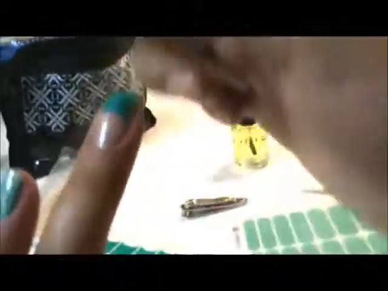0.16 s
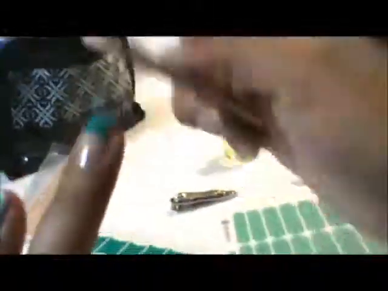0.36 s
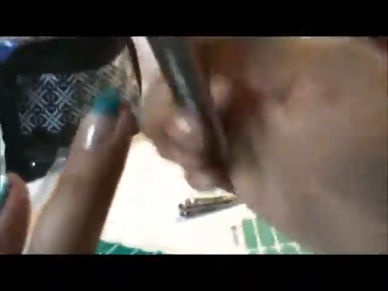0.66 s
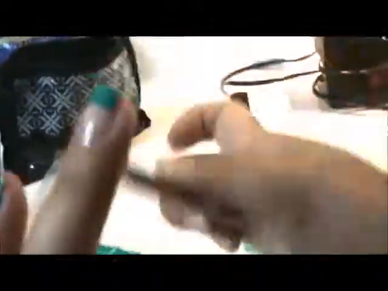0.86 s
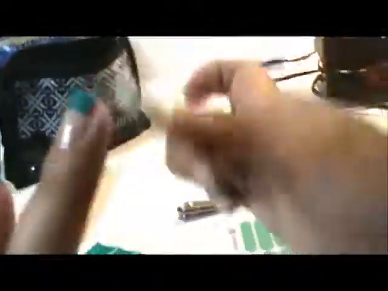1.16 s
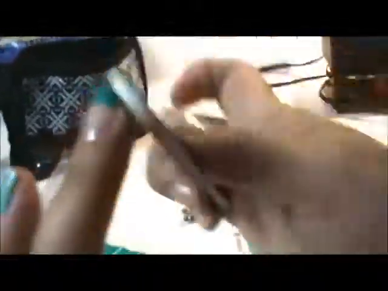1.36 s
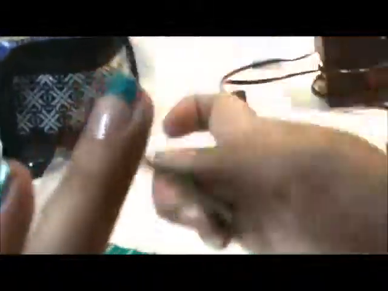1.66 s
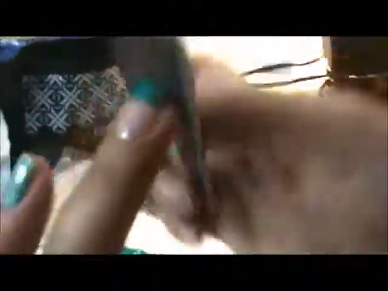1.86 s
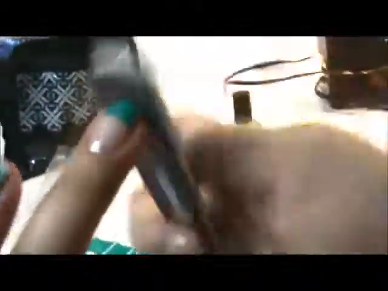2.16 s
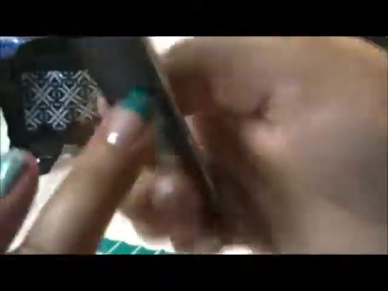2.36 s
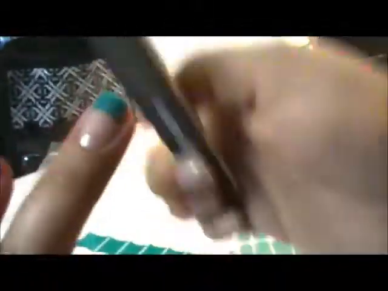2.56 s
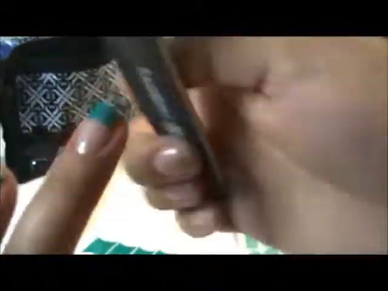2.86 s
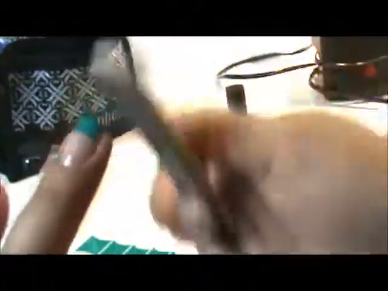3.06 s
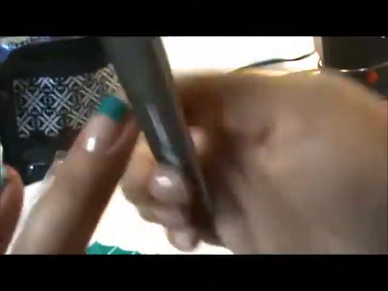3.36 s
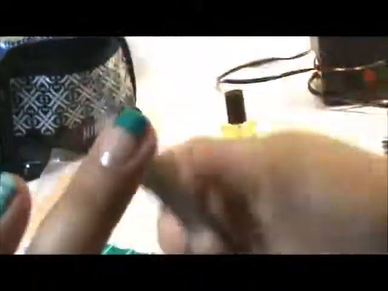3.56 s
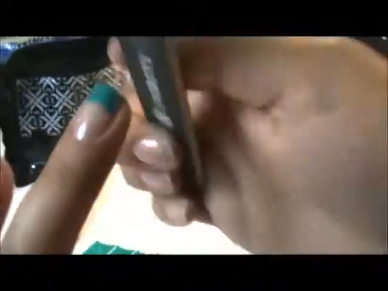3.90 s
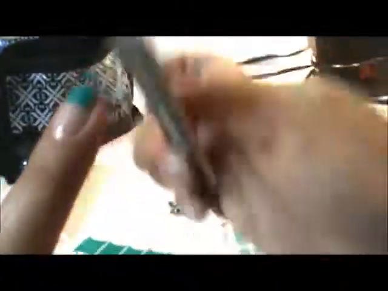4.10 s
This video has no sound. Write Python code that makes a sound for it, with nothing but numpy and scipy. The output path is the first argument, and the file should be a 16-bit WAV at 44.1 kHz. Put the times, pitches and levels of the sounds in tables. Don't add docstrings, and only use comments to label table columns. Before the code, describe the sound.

A steel nail file rasps in short quick strokes across a fingernail tip, each starting with a small tap, over a low fan hum.

```python
import sys
import numpy as np
from scipy import signal
from scipy.fft import rfft, irfft, next_fast_len
from scipy.io import wavfile
from scipy.ndimage import uniform_filter1d, map_coordinates

SR = 44100
rng = np.random.default_rng(int(sys.argv[2]) if len(sys.argv) > 2 else 0)


def undo_db(level):
    steps = np.asarray(level, float) / 20
    return 10 ** steps


def transcribe(signal):
    frames = np.atleast_2d(signal).T
    limited = np.clip(frames, -1, 1)
    pcm = np.round(limited * 32767).astype(np.int16)
    wavfile.write(sys.argv[1], SR, pcm)


N = 186763

# [time_s, fan_db]
FAN_LEVEL = [
    (0.0, -39.5),
    (0.4, -38.5),
    (0.87, -37),
    (1.83, -35.5),
    (2.2, -39.5),
    (2.3, -46),
    (2.56, -47),
    (2.71, -44),
    (3.06, -43),
    (4.23, -41),
]
# [freq_hz, density_db]
FAN_RUMBLE = [(15, -37), (25, -13), (107, -9), (166, -5), (199, -7.5), (356, -9), (386, -19.5), (433, -11),
              (579, -16), (670, -15.5), (1200, -21.5), (1560, -68), (2640, -120)]
# [freq_hz, width_hz, level_db]
FAN_DRONE = [(42.7, 5.3, 0), (124, 7.3, 5), (167.3, 5.4, 6), (301, 10.4, 3.5), (364, 7.4, 10.5)]
# [freq_hz, density_db]
AIR_HISS = [(530, -24), (900, 1), (1030, -10), (1970, 0), (2500, -8.5), (3590, -8), (3860, -14), (4360, -8),
            (16000, -21)]
# [freq_hz, likeness_0_to_1]
AIR_LIKENESS = [(60, 1), (250, 0.97), (600, 0.72), (1500, 0.29), (3300, 0.09), (8000, 0.63), (14000, 1)]
# [freq_hz, lead_rad]
AIR_LEAD = [(100, 0.068), (250, 0.18), (600, 0.28), (1300, 1.2), (2000, 2.7), (3300, 0.63)]
# [freq_hz, t60_s]
ROOM_DECAY = [(200, 0.29), (2000, 0.27), (10000, 0.099)]
# [middle_s, half_length_s, level_db, high_skim_share_0_to_1]
RETURNS = [(0.031, 0.0068, -41, 0.1), (0.192, 0.045, -55, 0.1), (0.518, 0.022, -59, 0.2),
           (0.805, 0.033, -47, 0.3), (1.085, 0.025, -44.5, 0.5), (1.374, .03, -54, 0.8),
           (1.633, 0.027, -48, 0.3), (1.88, 0.017, -46, 0.6), (2.16, 0.17, -52.5, 0.05),
           (2.445, 0.028, -52.5, 0), (2.712, 0.026, -48.5, 0), (2.975, 0.025, -49, 0.01),
           (3.213, 0.022, -53, 0.4), (3.504, 0.035, -46, 0.15), (3.751, 0.02, -48, 0.2),
           (4.014, 0.018, -48.5, 0.1)]
# [freq_hz, width_hz]
SKIM_BANDS = [(8100, 2600), (9800, 860)]
# [start_s, tick_peak_db, thud_db, thud_hz, flesh_gives_way_ms]
LANDINGS = [(0.0145, -10, -26.5, 203, 1), (0.0622, 3, -29.5, 150, 3.5), (0.325, -15, -32.5, 147, 3),
            (0.601, -9, -24.5, 193, 5), (0.875, -16.5, -23.5, 211, 3.6), (1.1464, -18, -25, 212, 3.4),
            (1.4224, -15.5, -26.5, 219, 2.9), (1.6899, -16, -22, 203, 1.8), (1.956, -7, -20.5, 237.4, 0.5),
            (2.2266, -5.5, -22.5, 210.6, -0.56), (2.4871, -37, -31.5, 220, 0), (2.7644, -8, -27, 249, -0.4),
            (3.0368, -11.5, -31, 175.7, -0.2), (3.3189, -9.5, -29.5, 278, 0.4),
            (3.5459, -21, -25.5, 250, -0.5), (3.807, -20.5, -27.5, 250, 0.8), (4.07, -24, -28.5, 223, 1)]
# [start_s, entry_db, contact_s, exit_db, liftoff_s]
FILING = [(.063, -26.5, .048, -26, .028), (.360, -31, .056, -33, .035), (0.632, -31.5, .068, -22.5, 0.017),
          (.900, -27, .062, -21.5, 0.019), (1.175, -26, .078, -28, 0.017), (1.446, -26.5, .072, -25, 0.023),
          (1.703, -22, .065, -21, .022), (1.9795, -18, .062, -26, 0.03), (2.255, -26, .055, -30, 0.041),
          (2.514, -38.5, .072, -33.5, 0.02), (2.793, -31, .066, -36, 0.0153),
          (3.078, -23, .062, -27.5, .045), (3.331, -23, .05, -25.5, 0.03), (3.575, -27.5, .066, -34, 0.019),
          (3.832, -29, .065, -31, .035), (4.0874, -22.5, .075, -29.5, 0.033)]
# [start_hz, top_hz, entry_db, exit_db, nail_body_db]
BENDS = [(150, 560, -6, -10, -3), (250, 450, -8.5, -3.5, -2.5), (292.4, 620, -7, -14, -3.5),
         (186.9, 760, -2, -16, -6), (220.1, 520, -6, -21.5, -6.5), (230.5, 600, -5, -24, -6),
         (204.9, 720, -4.5, -13.5, -5.5), (202.4, 650, 0.5, -12, -4), (151.5, 690, -3.5, -3.5, 0),
         (222, 450, 4.5, -14.5, -4), (250, 560, -0.5, -13, -2.5), (150, 700, -5, -7.5, -2.5),
         (282, 700, 0.5, -12, -2.5), (222.5, 500, -0.5, -14, -3), (242, 640, 4.5, -2.5, -1.5),
         (215.1, 590, -1.5, -8.5, -5)]
CHATTER_DEPTH = [2, 1.5, 2, 3, 2, 2, 2, 8, 7, 1.5, 3, 10, 3, 5, 5, 5]
# [start_s, peak_db]
GRIP_SKIPS = [(0.027, -11.5), (0.0384, -19), (0.346, -15.5), (1.971, 2), (2.249, -3), (3.3269, -7),
              (3.0567, -13), (3.0652, -5), (3.5702, -20), (1.1763, -9), (3.8181, -23), (3.8267, -11.5)]
# [start_s, peak_db]
GRIT_CATCHES = [(0.061, 8), (0.066, 6), (0.4286, -5), (0.6439, -13), (0.9024, -7), (0.957, 3.5),
                (1.4575, -6), (1.2427, 5), (1.252, -4), (1.51, -16), (1.7459, 10.5), (1.9793, 6.5),
                (1.9845, -1), (1.9928, 7), (2.002, 2), (2.0167, 2), (2.0368, 8), (2.2623, -7), (2.2674, 1),
                (2.2956, -6), (2.2825, -12), (2.799, -5.5), (3.077, -1.5), (3.084, 6), (3.0912, -2),
                (3.1106, -12), (3.1184, 4), (3.3335, -9), (4.088, -2), (4.0997, 3.5)]
# [start_s, peak_db]
TIP_FLICKS = [
    (0.443, -32),
    (0.9807, -25),
    (1.7817, -28),
    (2.058, -28),
    (2.598, -27),
    (2.8677, -25.5),
    (4.161, -23),
]
# [freq_hz, width_hz, level_db]
FLICK_TICK = [(4600, 3400, 1)]
# [freq_hz, density_db]
GRIT_COLOUR = [(1530, -25.5), (2600, -9), (4260, -5.5), (5110, -5), (6000, -3), (6780, -1.5), (7650, -8),
               (9330, -6), (9910, -11.5), (11600, -10), (13700, -17.5), (14900, -19), (16000, -24)]
# [freq_hz, width_hz, level_db]
WEAK_BLADE = [(9760, 1300, -21.5), (11160, 540, -12)]
# [freq_hz, width_hz, level_db]
BLADE_RING = [(6920, 200, 0), (7150, 220, -6), (6650, 240, -8)]
# [freq_hz, width_hz, level_db]
NAIL_BODY = [(1553, 287, 4), (1917, 680, 10)]
# [freq_hz, likeness_0_to_1]
FILE_LIKENESS = [(250, 0.98), (600, 0.8), (2000, 0.68), (3300, 0.67), (5000, 1), (9000, 0.6), (14000, 0.9)]
# [freq_hz, lean_db]
FILE_LEAN = [(250, -1.1), (600, 3.5), (1300, 2), (2000, 3.5), (5000, -0.6), (9000, 4), (14000, 2.5)]

BEND_LEAD_S = 0.00834
HALVES = np.array([[.5], [-.5]])


def unit(x):
    return x / np.sqrt(np.mean(x ** 2) + 1e-20)


def along(points, hz):
    f, v = np.transpose(points)
    return np.interp(np.log(hz + 1), np.log(f + 1), v)


def curves(rows):
    s, *cols = np.transpose(rows)
    return [np.interp(np.arange(N) / SR, s, c) for c in cols]


def wobble(rate):
    return map_coordinates(rng.standard_normal(N // 8), [np.arange(N) * rate / SR])


def filtered(x, response):
    m = next_fast_len(N + SR // 2)
    return irfft(rfft(x, m) * response(np.fft.rfftfreq(m, 1 / SR)), m)[..., :N]


def modes(table, f):
    return sum(undo_db(db) * 1j * f * w / (c * c - f * f + 1j * f * w) for c, w, db in table)


def causal(points, hz):
    cepstrum = irfft(np.log(undo_db(along(points, hz))))
    cepstrum[1:len(hz) - 1] *= 2
    cepstrum[len(hz):] = 0
    return np.exp(rfft(cepstrum))


def rush(spectrum, alike):
    def spread(hz):
        turn = np.arccos(np.clip(along(alike, hz), -1, 1)) / 2
        return spectrum(hz) * [np.cos(turn), np.sin(turn)]

    mid, side = filtered(rng.standard_normal((2, N)), spread)
    return unit(np.array([mid + side, mid - side]))


def patchy(x, depth_db):
    z = signal.stft(x, nperseg=256)[2]
    field = uniform_filter1d(rng.standard_normal(z.shape), size=4, axis=0)
    field = uniform_filter1d(field, size=5, axis=1)
    return signal.istft(z * undo_db(depth_db * unit(field)), nperseg=256)[1][:N]


def strike(rows, colour):
    t, out = np.arange(1500) / SR, np.zeros(N + 1500)
    for at, db, t60 in rows:
        swell = undo_db(db - 60 * t / t60) * (1 - np.exp(-t / 0.00039))
        out[round(at * SR):][:1500] += swell * rng.standard_normal(1500)
    return filtered(out[:N], colour)


def air():
    fan_db, = curves(FAN_LEVEL)
    hiss_db = -51 + 0.9 * (fan_db - fan_db.mean())
    fan = rush(lambda hz: undo_db(along(FAN_RUMBLE, hz)) * (1 + np.abs(modes(FAN_DRONE, hz))), AIR_LIKENESS)
    hiss = rush(lambda hz: undo_db(along(AIR_HISS, hz)), AIR_LIKENESS)
    sway_db = .8 * wobble(6)
    both = undo_db(fan_db + 0.6 + sway_db) * fan + undo_db(hiss_db + 3.5) * hiss
    return filtered(both, lambda hz: np.exp(1j * along(AIR_LEAD, hz) * HALVES))


def room(x):
    hz, t, z = signal.stft(rng.standard_normal((2, SR // 3)), SR, nperseg=256)
    decay = undo_db(-60 * t / along(ROOM_DECAY, hz)[:, None])
    tail = signal.istft(z * decay, SR, nperseg=256)[1]
    late = np.pad(x, (200, 0))[None]
    return signal.fftconvolve(late, tail / np.linalg.norm(tail[0]), axes=1)[:, :N]


def skim(freq_hz, width_hz):
    def spectrum(hz):
        return modes([(freq_hz, width_hz, 0)], hz) ** 2 + undo_db(-8.5) * modes([(3500, 12000, 0)], hz)

    return rush(spectrum, [(8000, 0.49)])


def swish():
    t = np.arange(N) / SR
    low, high = (skim(*band) for band in SKIM_BANDS)
    puffs = np.zeros((2, N))
    for middle, half, db, share in RETURNS:
        puff = undo_db(db) * np.exp(-((t - middle) / half) ** 2 / 2)
        puffs += puff * np.sqrt([[1 - share], [share]])
    return undo_db(2.0 * wobble(60)) * (puffs[0] * low + puffs[1] * high)


def steel(hz):
    gain = causal(GRIT_COLOUR, hz) * (1 + modes(WEAK_BLADE, hz))
    return gain / np.sqrt(np.mean(np.abs(gain) ** 2))


def ticks(rows, tilt):
    first = [(s, db + 0.5, .006) for s, db, *_ in rows]
    second = [(s + lag_ms / 1000, db - 12.5, .012) for s, db, *_, lag_ms in rows]
    return undo_db(-8.0) * strike(first + second, lambda hz: steel(hz) * (hz / 7000) ** tilt)


def taps():
    out, t = np.zeros(N + SR), np.arange(2000) / SR
    for s, tick_db, thud_db, hz, lag_ms in LANDINGS:
        knock_db = -2 + 0.32 * tick_db + 0.68 * thud_db - 2 * lag_ms
        swell = undo_db(thud_db + 15.5 - 60 * t / 0.027) * (1 - np.exp(-t / 0.00034))
        dive = 1 + 0.79 * np.exp(-t / 0.0012)
        thud = swell * np.sin(2 * np.pi * hz * t * dive)
        knock = sum(undo_db(knock_db + lift_db - 60 * t / 0.0035) * np.sin(2 * np.pi * f_hz * t)
                    for f_hz, lift_db in [(750, 8.0), (1500, 7.5), (2300, -14)])
        out[round((s + lag_ms / 1000) * SR):][:2000] -= thud + knock
    edge = [row for row in LANDINGS if row[-1] >= 1]
    flat = [row for row in LANDINGS if row[-1] < 1]
    return out[:N] + ticks(edge, tilt=0.46) + ticks(flat, tilt=0.029)


def bending():
    bow = .6
    rows = []
    for (s, _, hold, _, lift), (lo_hz, hi_hz, *_), db in zip(FILING, BENDS, CHATTER_DEPTH):
        lo, hi = lo_hz ** bow, hi_hz ** bow
        rows += [(s - BEND_LEAD_S, lo, db), (s, lo, db),
                 (s + .9 * hold, hi, db), (s + hold + lift, hi, db)]
    bowed_hz, chatter_db = curves(rows)
    return bowed_hz ** (1 / bow), chatter_db


def stroke_curves():
    attack_s, attack_db = .008, 6.5
    drop_s, drop_db, release_db = 0.0042, 2.5, 26
    rows, touching, t = [], np.zeros(N), np.arange(N) / SR
    for (s, a, hold, b, lift), (*_, bend_a, bend_b, nail) in zip(FILING, BENDS):
        end = s + hold
        rows += [(s, 0, a - attack_db, nail, bend_a), (s + attack_s, 0, a, nail, bend_a),
                 (end, 1, b, nail, bend_b), (end + drop_s, 1, b - drop_db, nail, bend_b),
                 (end + lift, 1, b - release_db, nail, bend_b)]
        touching += (t > s) * (t < end + lift)
    gone, rasp_db, nail_db, bend_db = curves(rows)
    arch_db = 3.5 * np.sin(np.pi * gone ** 0.91)
    level = uniform_filter1d(touching, size=50) * undo_db(rasp_db + arch_db)
    speed = np.sin(np.pi * gone)
    ring_db = -17 + 11 * gone + 9 * speed
    return level, nail_db - 3 * gone, bend_db + speed, ring_db


def bending_note(phase):
    def shaken(rate, order):
        return wobble(rate) * np.cos(order * phase) + wobble(rate) * np.sin(order * phase)

    pure = np.sin(phase) * undo_db(2.2 * wobble(110))
    return unit(pure + 0.66 * shaken(420, order=1) + 0.36 * shaken(500, order=2))


def catch_colour(hz):
    edge = steel(hz) * (hz / 7000) ** 0.52
    return edge * (1 + undo_db(1.5) * modes(BLADE_RING, hz)) + undo_db(-8) * modes(NAIL_BODY, hz)


def rasp():
    level, nail_db, bend_db, ring_db = stroke_curves()
    bend_hz, chatter_db = bending()
    phase = 2 * np.pi * np.cumsum(bend_hz * (1 + .075 * wobble(150))) / SR
    bend = bending_note(phase)

    load_db = chatter_db * 250 / bend_hz * np.cos(phase) + 1.1 * wobble(300) + 0.64 * wobble(120)
    load = undo_db(load_db)
    load = load / np.sqrt(uniform_filter1d(load ** 2, size=1500))
    teeth = load * rng.standard_normal((2, N)) * undo_db(1.44 * rng.exponential(size=N))
    grit = unit(patchy(teeth[0], depth_db=2.0))

    bites = [(s, db + 13) for s, db, *_ in FILING]
    catches = [(s, db, 0.0096) for s, db in GRIP_SKIPS + GRIT_CATCHES + bites]
    bright = filtered(level * grit, steel) + undo_db(-13.0) * strike(catches, catch_colour)
    ring = unit(filtered(grit, lambda hz: modes(BLADE_RING, hz)))
    scrape = patchy(0.5 * teeth[0] + 0.99 * teeth[1], depth_db=3.5)
    body = unit(filtered(scrape, lambda hz: modes(NAIL_BODY, hz) * hz / (hz + 900)))

    early = 0.5 * np.roll(level, -round(BEND_LEAD_S * SR))
    drive = np.maximum(level, early) * undo_db(bend_db + 1.0)
    note = filtered(drive * bend, lambda hz: (1j * hz / (1j * hz + 109)) ** 2)
    flicks = strike([(s, db, 0.0096) for s, db in TIP_FLICKS],
                    lambda hz: undo_db(7.5) * modes(FLICK_TICK, hz) ** 2)
    return bright + flicks + note + level * (undo_db(ring_db - 3.5) * ring + undo_db(nail_db) * body)


def near(x):
    other, hop = np.zeros(N + 3000), 2048
    for i in range(0, N, hop):
        echo = rng.standard_normal(220) * undo_db(-60 * np.arange(220) / SR / 0.0044)
        piece = np.convolve(x[i:i + hop], echo / np.linalg.norm(echo))
        other[i:i + len(piece)] += piece

    def unlike(hz):
        alike = np.clip(along(FILE_LIKENESS, hz), 0, 1)
        return np.sqrt((1 - alike) / (1 + alike))

    side = filtered(other[:N], unlike)
    return filtered(np.array([x + side, x - side]), lambda hz: undo_db(along(FILE_LEAN, hz) * HALVES))


def scene():
    hand = rasp() + taps()
    return near(hand) + undo_db(-16.0) * room(hand) + swish() + air()


def roll_off(x):
    return signal.sosfilt(signal.butter(12, 16990, fs=SR, output="sos"), x)


def record(dry):
    dry = filtered(dry, lambda hz: (1j * hz / (1j * hz + 22)) ** 2)
    clipped = np.clip(dry, -.86, .86)
    kept = filtered(clipped, lambda hz: .008 * (hz < 17000) + .97 / (1 + (hz / 15830) ** 150))
    return roll_off(kept)


dry = scene()
out = record(dry)
transcribe(out)
```